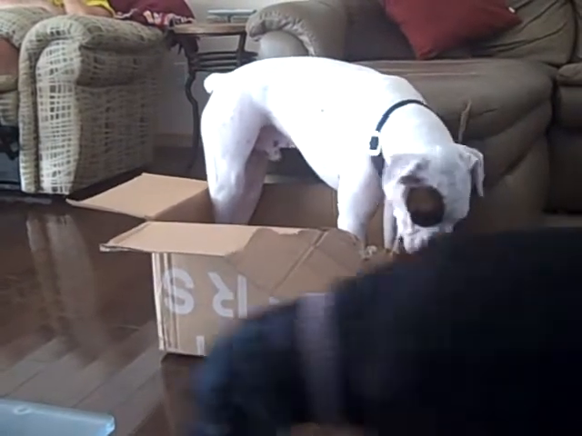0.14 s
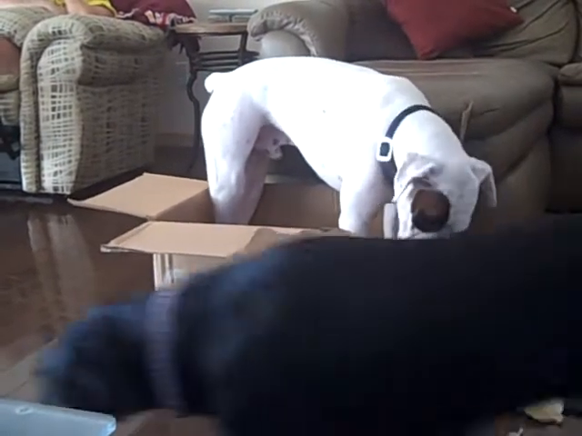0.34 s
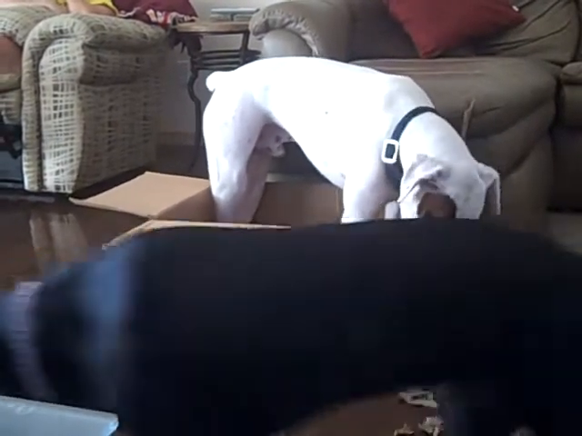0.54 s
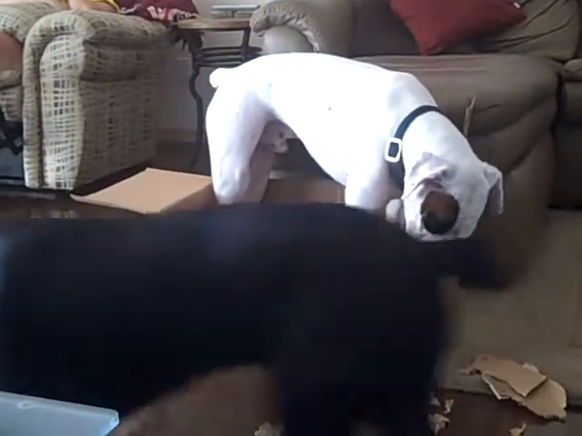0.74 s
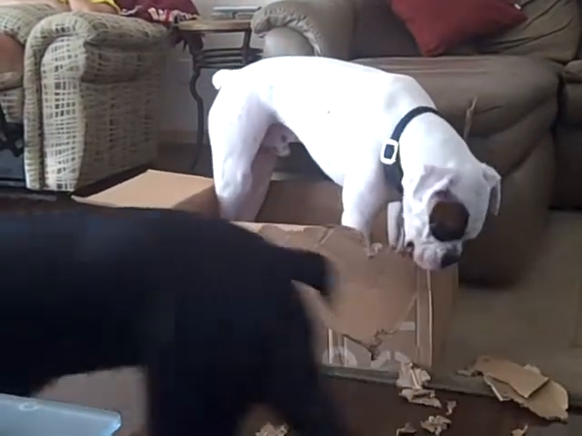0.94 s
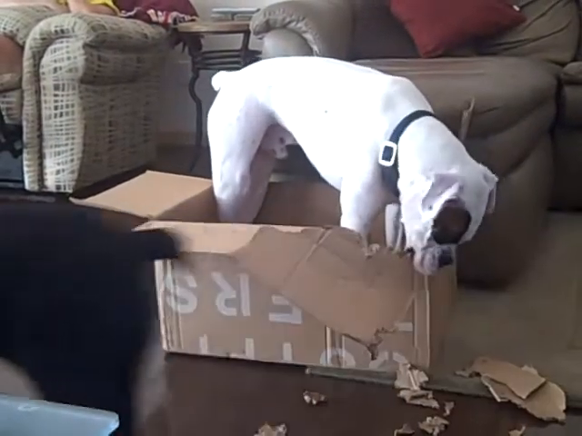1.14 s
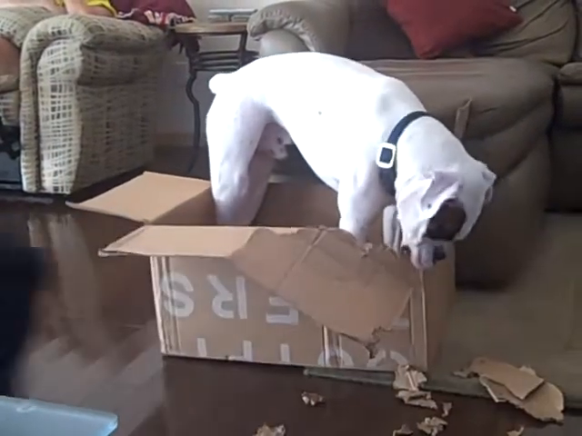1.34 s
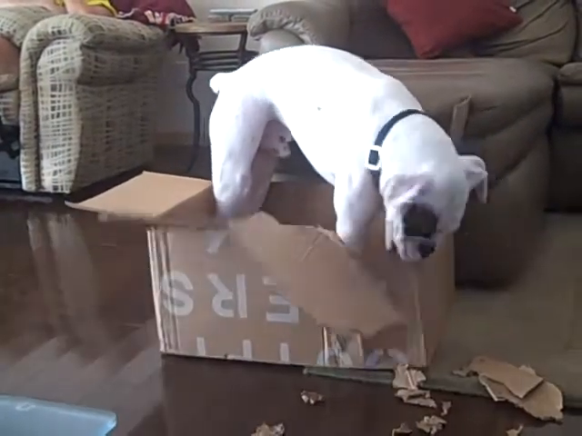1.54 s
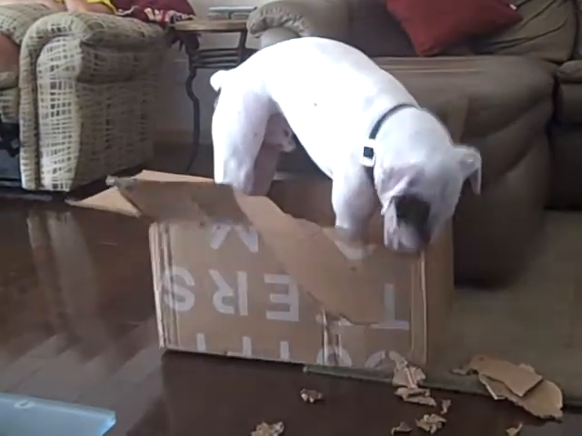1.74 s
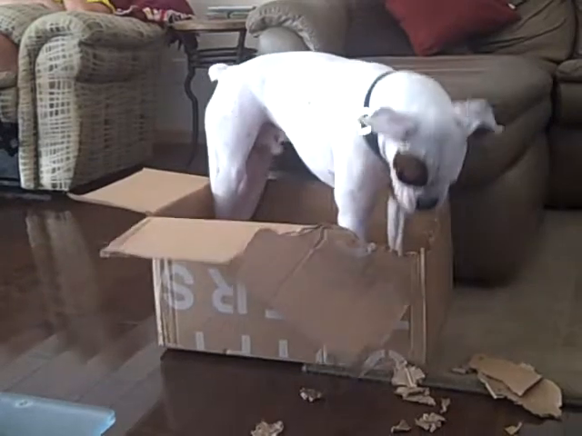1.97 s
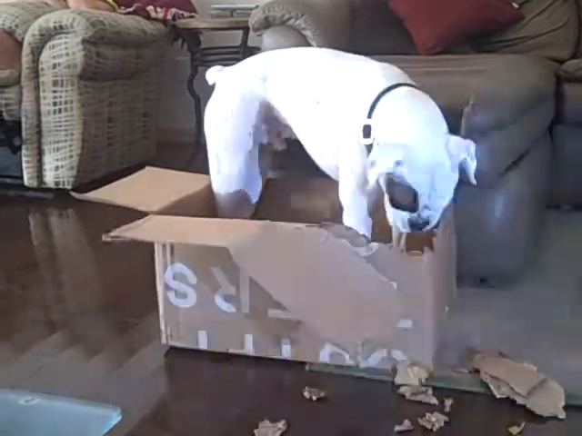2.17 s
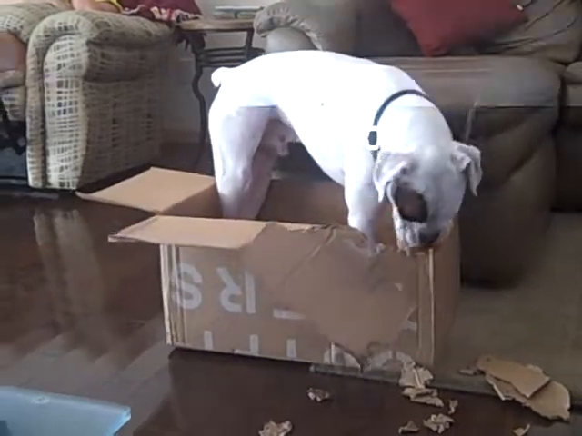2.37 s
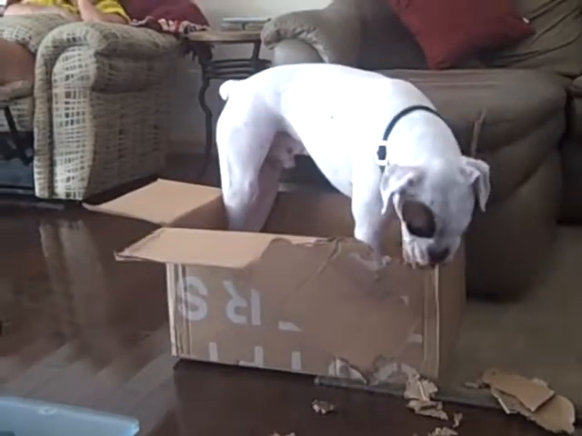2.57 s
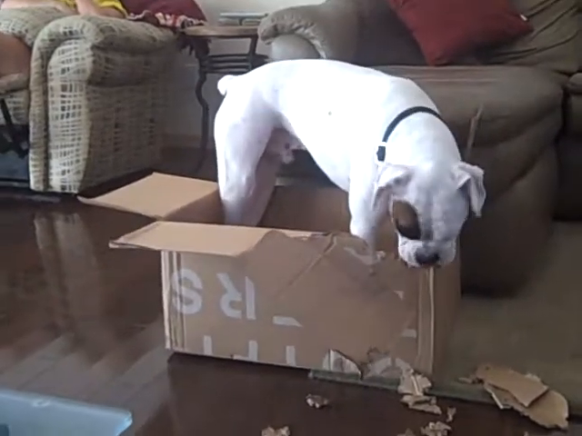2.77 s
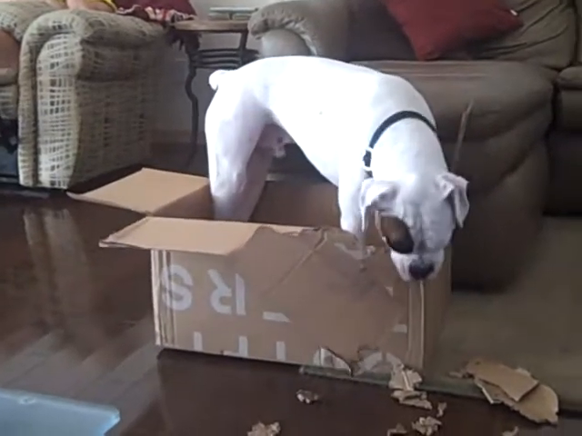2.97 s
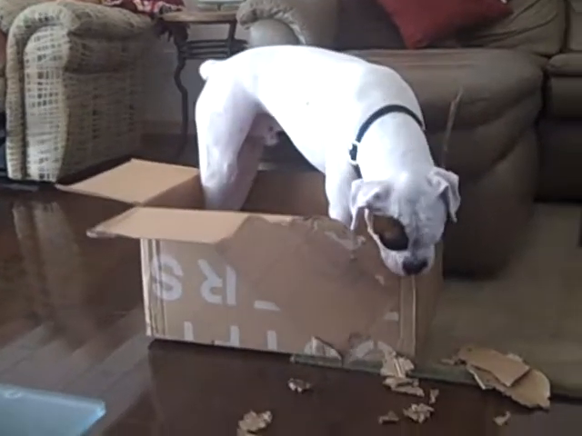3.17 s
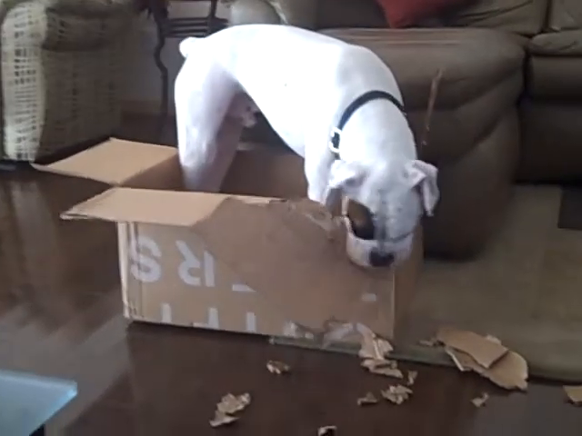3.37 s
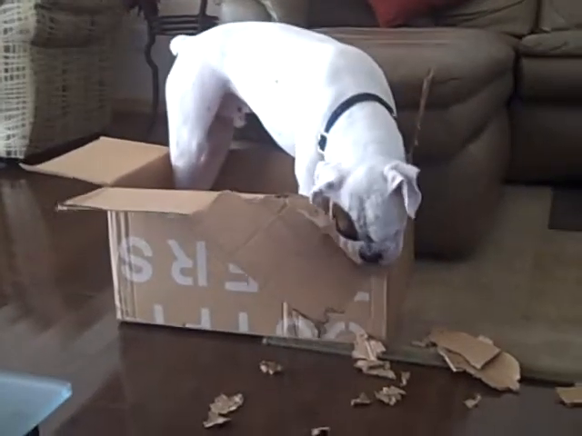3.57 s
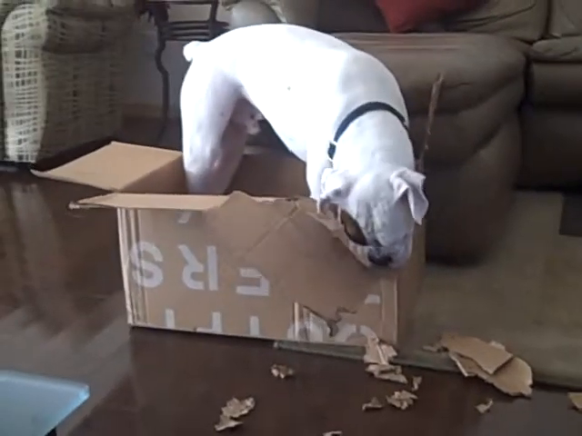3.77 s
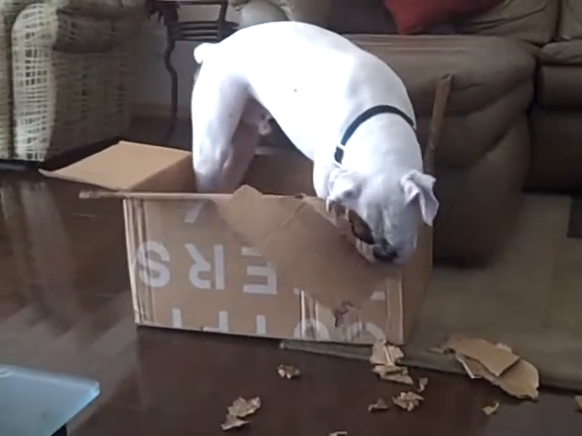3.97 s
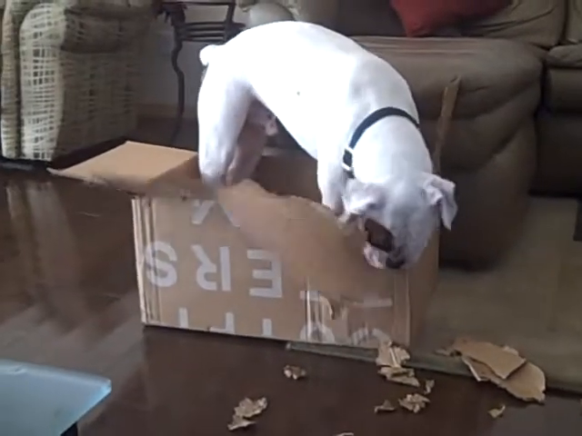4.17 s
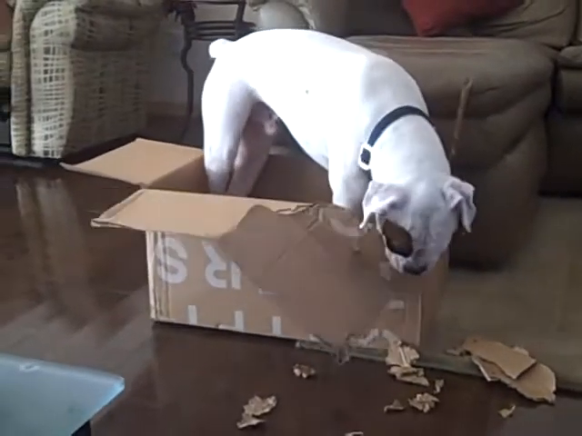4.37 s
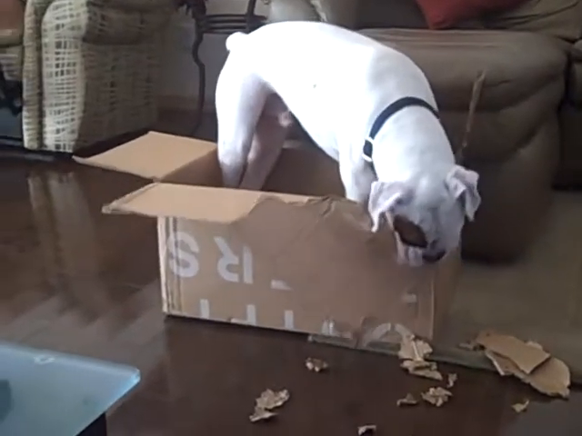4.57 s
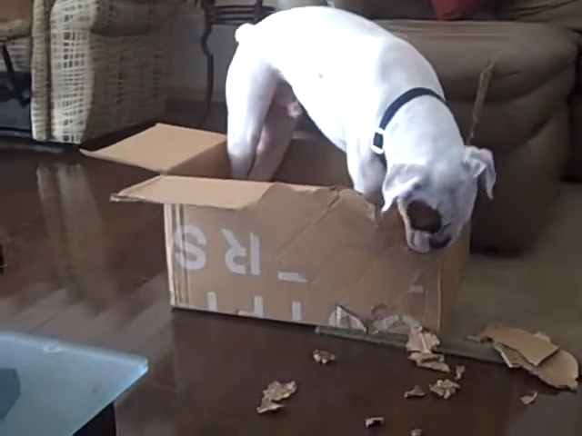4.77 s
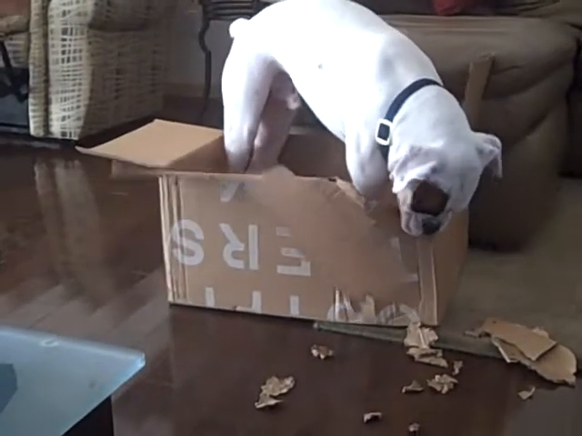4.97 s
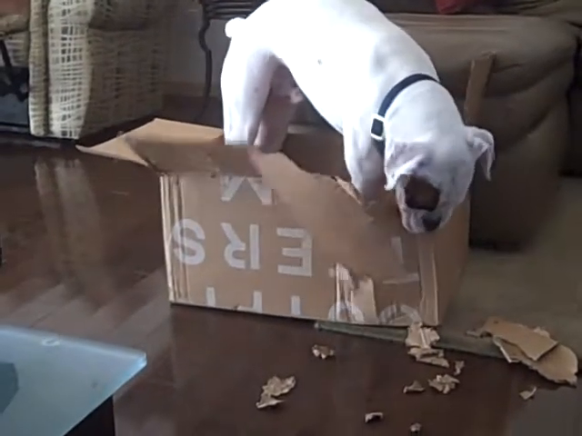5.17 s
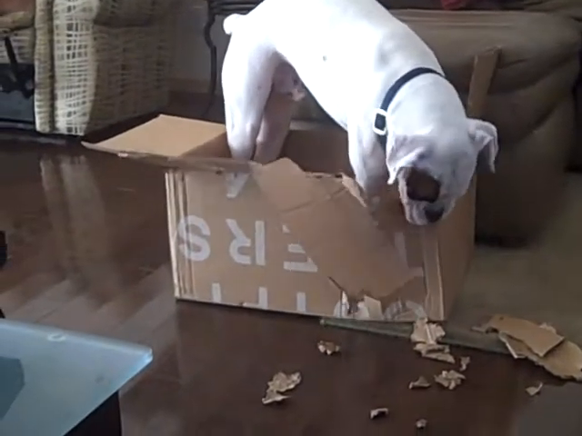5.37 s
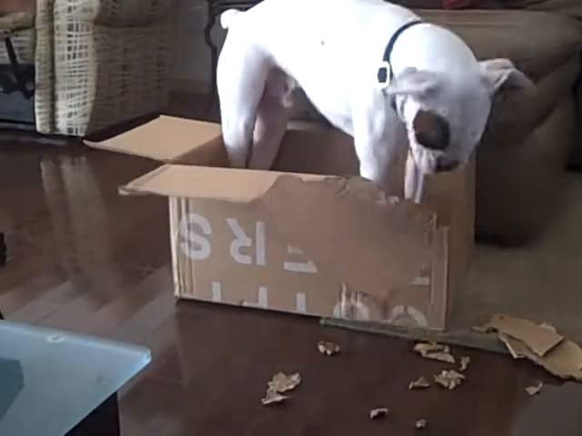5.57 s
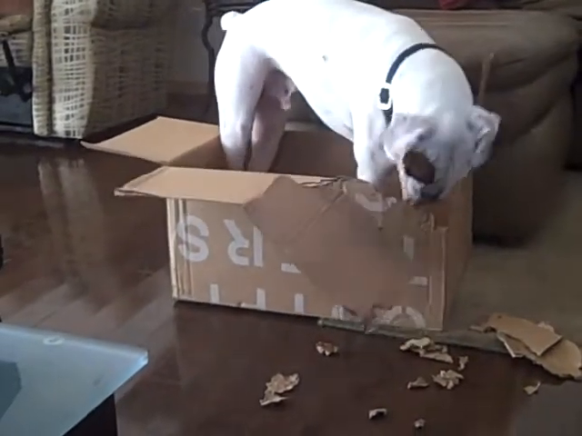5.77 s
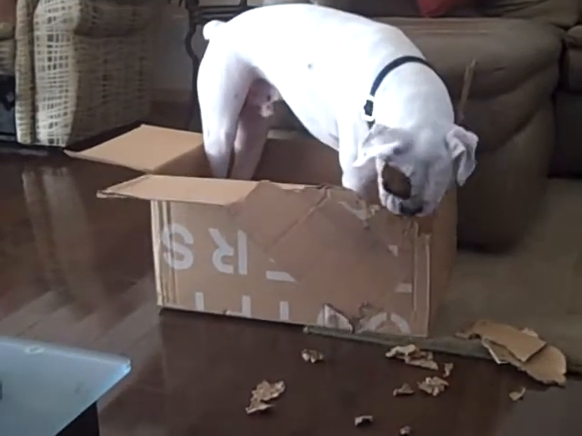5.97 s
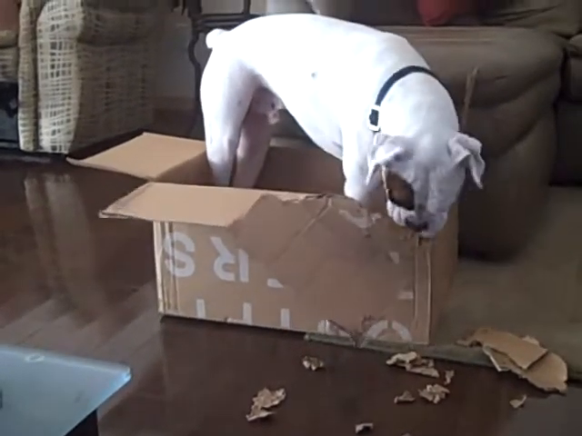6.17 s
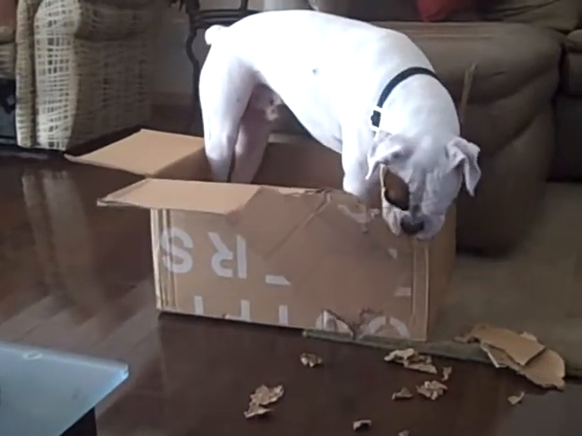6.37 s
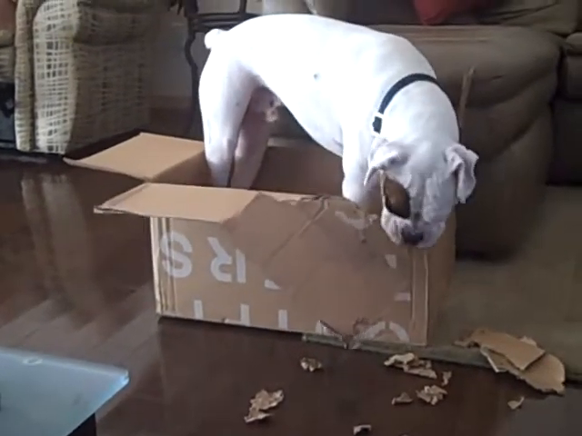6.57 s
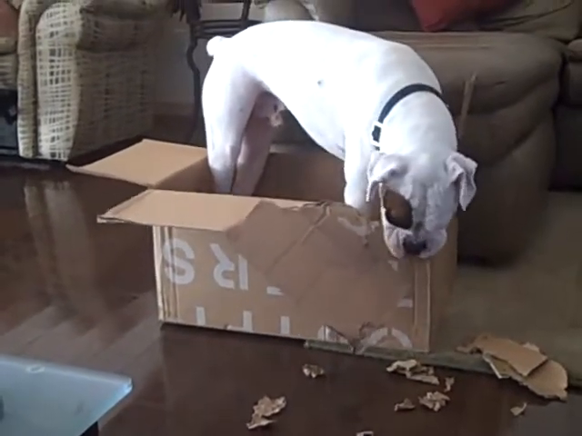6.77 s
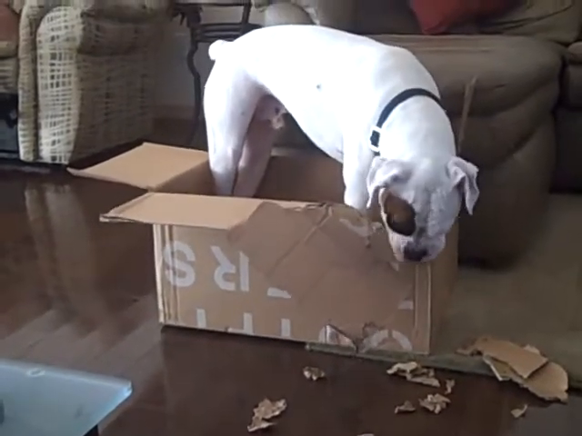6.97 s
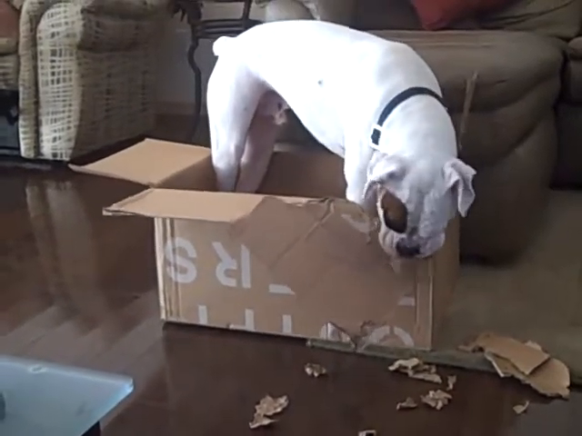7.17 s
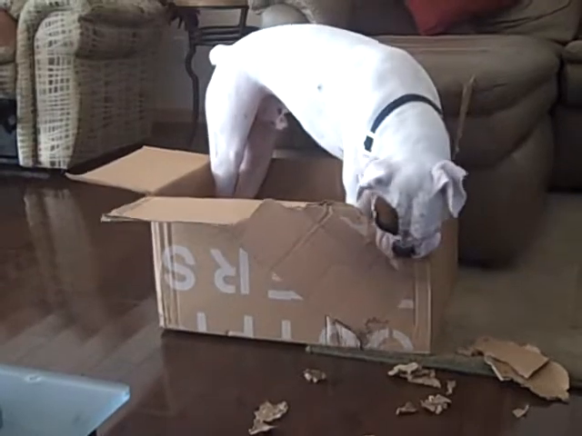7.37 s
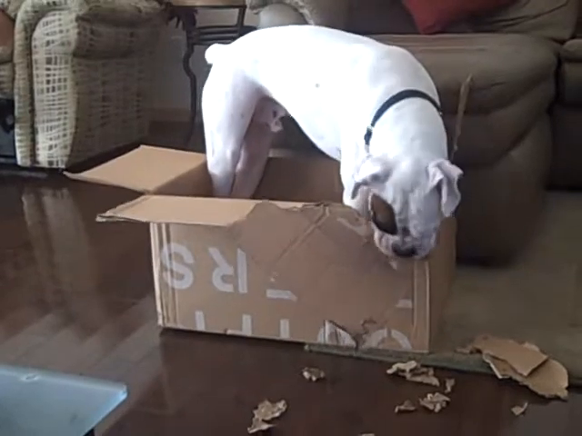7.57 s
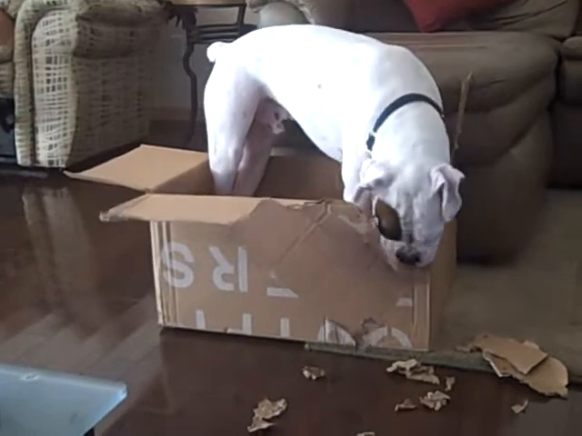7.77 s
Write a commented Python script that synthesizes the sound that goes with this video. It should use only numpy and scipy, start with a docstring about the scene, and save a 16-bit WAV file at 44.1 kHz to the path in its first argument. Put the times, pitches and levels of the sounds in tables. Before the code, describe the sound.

A dog gnaws at a cardboard box in a living room. Fine ripping crackles and dry rubbing come in uneven bursts, broken by sharp snaps and hollow knocks. Two harder tugs each bring a cluster of cracks and a deep thump, followed by soft sniffs and huffs. Near the end the dog whines very faintly as the chewing goes on. One small microphone picks it up from a few metres away.

```python
"""A living room: a dog stands in a cardboard box, chewing and tearing at its rim. Flutes snap and knock the
hollow panels, the paper liner rips in a fine crackle, card rubs on card. The dog snuffles through nose and
muzzle between tugs and whines faintly near the end. A few dry pops sound; after the two hardest tugs the
baseline jumps, then steps back. One small microphone, a few metres off."""
import sys
import numpy as np
from scipy import signal
from scipy.fft import rfft, irfft, next_fast_len
from scipy.io import wavfile

SR = 44100
rng = np.random.default_rng(int(sys.argv[2]) if len(sys.argv) > 2 else 0)


def dump_mix(stems):
    """Bounce the given channels to the path in sys.argv[1] as a 16-bit WAV at rate SR."""
    frames = np.atleast_2d(stems).T  # one column per channel
    limited = np.clip(frames, -1, 1)  # hard clip at full scale
    pcm = np.round(limited * 32767).astype(np.int16)
    wavfile.write(sys.argv[1], SR, pcm)


N = 344641
TIME_S = np.arange(N) / SR

# Spectral shapes. Each row: frequency in Hz, relative density in dB.
AIR_SPECTRUM = [(15, -24), (25, -7), (70, -18.5), (309, -17.5), (516, -16.5), (714, -12.5), (1070, -17.5),
                (2550, -18.5), (4610, -23), (12900, -35), (16000, -48)]
NOSTRIL_SPECTRUM = [(3500, -14), (4800, -1), (5300, 2.5), (5900, 2.5), (6600, 2), (7300, -11), (9000, -2),
                    (12000, -20), (16000, -10)]
HUFF_SPECTRUM = [(300, -9), (550, -8), (760, 5.5), (1050, -6), (1450, 0), (1850, -9.5), (2200, -7),
                 (2800, -5.5), (4000, -8.5), (5400, -10), (6300, -13), (7500, -13), (16000, -27)]
RIP_SPECTRUM = [(500, -6.5), (1500, 0.5), (3000, 0.5), (4500, 1), (7000, 0.5), (10000, 2), (13000, 2.5),
                (16000, -5.5)]
RUB_SPECTRUM = [(300, -7), (520, -4), (720, -3.5), (1000, 2), (1500, -1), (2200, -2.5), (3200, -7),
                (5000, -22), (9000, -43)]
FLEX_SPECTRUM = [(70, -14), (130, -11), (200, -1.5), (280, -3), (420, 2), (600, -10), (1200, -12.5)]
# Room decay. Each row: frequency in Hz, T60 in seconds.
REVERB_T60_S = [(120, .42), (300, .48), (800, .53), (2000, .55), (5000, .53), (10000, .44), (16000, .35)]
# Reverberation. Each row: frequency in Hz, level against the direct sound in dB.
REVERB_DB = [(120, -5), (300, -3.5), (800, -1.5), (2000, -3), (5000, -1.5), (10000, -7.5), (16000, -6.5)]
# Baseline jumps. Each row: start in seconds, step height as a fraction of full scale.
THUMPS = [(1.768, 0.018), (5.43, 0.018)]
# Dry pops. Each row: start in seconds, frequency in Hz, peak in dB, T60 in seconds.
DRY_POPS = [(3.231, 1860, -34, .011), (3.2322, 263, -46, .051), (5.712, 1240, -31, .014)]
# Whine. Each row: start in seconds, length in seconds, first and last pitch in Hz, relative level in dB.
WHINE_NOTES = [(6.959, 0.084, 440, 408, -56.5), (7.152, 0.16, 428, 405.6, -57), (7.41, .04, 427, 414, -62)]
# Sniffs. Each row: start in seconds, length in seconds, relative level in dB, nostril whistle in Hz.
NOSE_SNIFFS = [(2.17, 0.13, -67.5, 5860), (2.365, 0.073, -60, 5450), (2.548, 0.1, -63.5, 6460),
               (2.692, 0.068, -65, 6140), (3.062, 0.042, -70, 6000), (5.83, 0.047, -61, 5300),
               (6.037, 0.24, -67, 5800)]
# Wheezes. Each row: start in seconds, length in seconds, relative level in dB.
NOSE_WHEEZES = [(2.95, 0.15, -67), (6.6, 0.46, -76)]
# Huffs. Each row: start in seconds, length in seconds, relative level in dB, throat resonance in Hz.
MUZZLE_HUFFS = [(2.17, .1, -67, 1380), (2.38, 0.103, -64.5, 1400), (2.5, 0.053, -58, 1650),
                (2.55, 0.063, -55.5, 2200), (2.64, .11, -62, 1400), (5.85, 0.068, -58, 1480),
                (6.19, 0.053, -55.5, 2600), (6.255, 0.036, -51, 3270), (6.3, 0.024, -52.5, 2150)]
# Box resonances. Each row: frequency in Hz, width in Hz, relative gain in dB.
BOX_MODES = [(162.3, 7.1, -4), (209, 24, 3), (253.7, 23.7, 6.5), (308, 8.6, 3.5), (413, 11, 2),
             (636, 111, 4), (740, 41, 2.5), (1180, 52, -1), (1420, 165, -10.5), (1800, 400, -5.5)]
# Jaw tugs. Each row: start in seconds, length in seconds, relative rip and rub levels in dB.
JAW_TUGS = [(0.014, 0.16, -62, -53.5), (0.414, 0.093, -90, -54.5), (0.635, 0.12, -81, -54.5),
            (0.727, .08, -66, -50), (1.092, .14, -57, -49.5), (1.33, 0.17, -56.5, -69),
            (1.474, 0.041, -50.5, -44.5), (1.57, 0.22, -62.5, -56), (1.94, 0.14, -61, -56.5),
            (2.273, 0.45, -63, -60.5), (2.914, 0.35, -68, -57.5), (3.35, 0.27, -62.5, -55),
            (3.694, 0.043, -56, -52.5), (3.782, 0.15, -58.5, -58), (3.954, 0.027, -52.5, -55),
            (4.026, 0.061, -56, -68), (4.17, 0.16, -62.5, -58.5), (4.702, 0.023, -52.5, -49),
            (4.764, 0.076, -55.5, -45), (4.843, 0.092, -54.5, -52), (4.982, 0.036, -51.5, -45),
            (5.054, 0.18, -54, -50.5), (5.164, 0.057, -58, -47.5), (5.274, 0.28, -58, -53),
            (5.56, 0.19, -58, -57.5), (5.84, 0.47, -64, -66), (6.622, 0.11, -62.5, -54.5),
            (6.843, 0.18, -68.5, -55), (7.155, 0.18, -55.5, -46), (7.39, 0.31, -68.5, -54),
            (7.63, 0.2, -81, -49), (7.77, .05, -59, -41.5)]
# Snap bands: panel thud, knock, crack, crunch, fibre fizz. Each row: low and high edge in Hz.
SNAP_BANDS_HZ = [(155, 450), (450, 1200), (1200, 3500), (3500, 8000), (8000, 15900)]
# Snapping flutes. Each row: start in seconds, fracture decay in seconds, ring of the torn piece in Hz,
# relative level in dB, tilt in dB per octave, relative panel thud in dB.
FLUTE_SNAPS = [(0.0834, 0.0038, 4500, -62.5, 3, -81), (.338, 0.017, 720, -68.5, -7, -58),
               (0.4029, .002, 2430, -63, -1.5, -62), (.4672, 0.0039, 3680, -61, -0.5, -65),
               (0.627, 0.015, 593, -66.5, -6.5, -56), (.69, 0.025, 2060, -62.5, -1, -57),
               (.735, .0033, 3120, -49.5, 0, -60), (.7807, 0.0012, 2550, -56.5, 0.5, -75),
               (.856, 0.011, 805, -54.5, -3.5, -53), (.895, .006, 715, -61, -1.5, -72),
               (1.0249, 0.0086, 900, -56.5, -5, -52.5), (1.085, .0045, 1730, -45, 1, -49),
               (1.2172, 0.0034, 3250, -62, 4, -69), (1.236, .0017, 4540, -64, 2.5, -71),
               (1.471, 0.0086, 5480, -60.5, 1.5, -54), (1.74, 0.006, 1840, -47, 2, -41.5),
               (1.753, 0.012, 1900, -50, 2.5, -45), (1.7673, 0.0025, 1050, -36.5, 1, -40),
               (1.7689, 0.0019, 1690, -41, 2.5, -43), (1.7778, 0.0052, 647, -40, -4.5, -31),
               (1.8007, 0.0029, 460, -43, -5, -46), (1.854, .0026, 1020, -56, 3.5, -66),
               (3.0313, 0.0048, 630, -59, -4.5, -51), (3.048, .004, 640, -70, -1, -56),
               (3.342, 0.0022, 630, -63, -5, -56), (3.4414, .0021, 1810, -60, -5, -67),
               (3.4767, 0.0025, 1470, -37, -3.5, -44), (3.5057, 0.004, 1910, -60, 5.5, -51),
               (3.6558, .0027, 1670, -67, 4, -74), (3.699, .0045, 2900, -58.5, -1, -65),
               (3.7861, .0029, 3520, -65, 0, -73), (4.0294, 0.0037, 1440, -68, 4, -76),
               (4.19, 0.0014, 1480, -49.5, -1, -55.5), (4.378, 0.021, 1240, -56.5, -4.5, -52),
               (4.399, 0.012, 1430, -52.5, -3, -72), (4.5359, 0.0025, 1450, -50.5, -5.5, -50),
               (4.592, 0.0026, 1710, -36.5, -2, -48), (4.615, 0.00038, 1670, -42, -3, -51),
               (4.7814, 0.0033, 2000, -47, -1, -52.5), (4.803, .002, 3200, -55, -1, -64),
               (4.985, 0.0053, 1410, -60.5, 0.5, -56.5), (5.0828, 0.0019, 2080, -73, 6.5, -53),
               (5.1728, 0.016, 5730, -48, 0, -49), (5.4276, 0.0017, 1470, -36, 1, -37),
               (5.4336, 0.0036, 674, -37.5, -1.5, -36.5), (5.455, 0.0093, 1190, -44.5, -7.5, -42),
               (5.508, 0.0056, 1240, -52.5, -7, -43), (5.8376, 0.00079, 5120, -65.5, 2.5, -77),
               (6.467, 0.00083, 2490, -67.5, -3, -78), (6.535, 0.0041, 647, -62.5, -0.5, -57),
               (6.566, 0.0023, 700, -68.5, -6.5, -57.5), (6.584, 0.0017, 2520, -60.5, -2.5, -57),
               (6.713, .002, 3480, -64, -2, -60), (6.8029, 0.0034, 3300, -49, -0.5, -47),
               (7.0789, 0.0015, 890, -52.5, -5, -50.5), (7.1601, 0.00082, 3930, -58, -0.5, -68),
               (7.1974, 0.0011, 740, -42.5, -1.5, -39.5), (7.5571, 0.0013, 675, -37, -3, -41.5),
               (7.578, 0.00086, 980, -48, -5, -55), (7.7622, 0.0014, 805, -53, -4, -47.5),
               (7.796, 0.003, 4100, -45, -0.5, -55)]


def from_db(db):
    """Decibels to gain."""
    return 10 ** (np.asarray(db) / 20)


def unit_rms(x):
    """Scale to rms 1."""
    return x / np.sqrt(np.mean(x ** 2) + 1e-20)


def at_hz(table, hz):
    """Read a table on a log-frequency axis."""
    knots_hz, values = np.transpose(table)
    return np.interp(np.log(np.maximum(hz, 1)), np.log(knots_hz), values)


def bandpass(x, low_hz, high_hz, order=2):
    """Causal Butterworth band-pass."""
    sos = signal.butter(order, [low_hz, high_hz], "band", fs=SR, output="sos")
    return signal.sosfilt(sos, x + 1e-18)


def resonance(x, hz, width_hz):
    """Two-pole resonance, unity peak gain."""
    r = np.exp(-np.pi * width_hz / SR)
    feedback = [1, -2 * r * np.cos(2 * np.pi * hz / SR), r * r]
    return signal.lfilter(np.array([1, 0, -1]) * (1 - r * r) / 2, feedback, x + 1e-18)


def coloured(x, spectrum):
    """Give a steady texture a spectrum; rms 1."""
    size = next_fast_len(N)
    gain = from_db(at_hz(spectrum, np.arange(size // 2 + 1) * SR / size))
    return unit_rms(irfft(rfft(x, size) * gain, size)[:N])


def drift(knots_per_s):
    """Random wander, standard deviation 1."""
    knots = rng.standard_normal(N // 10)
    return np.interp(TIME_S * knots_per_s, np.arange(len(knots)), knots) * np.sqrt(3 / 2)


def swells(rows, attack_s, release_s):
    """Trapezoid gains summed in power. Each row: start in seconds, length in seconds, level in dB."""
    gain = np.zeros(N)
    for start_s, length_s, db in rows:
        end_s = start_s + max(length_s, attack_s)
        corners_s = [start_s - attack_s / 2, start_s + attack_s / 2, end_s, end_s + release_s]
        gain = np.hypot(gain, from_db(db) * np.interp(TIME_S, corners_s, [0, 1, 1, 0]))
    return gain


def still_air(level_db=-64):
    """Steady, faint room noise."""
    return from_db(level_db) * coloured(rng.standard_normal(N), AIR_SPECTRUM)


def room(x, first_s=0.004, build_s=0.008, ceiling_s=0.044, echo_db=1.5):
    """Diffuse reverberation builds, swells with the ceiling echo and dies band by band."""
    t = TIME_S[:SR * 3 // 4]
    white, tail = rng.standard_normal((2, len(t))), np.zeros(len(t))
    onset = 1 - np.exp(-np.maximum(t - first_s, 0) / build_s)
    onset *= from_db(echo_db * np.exp(-((t - ceiling_s) / 0.01) ** 2))
    edges_hz = np.geomspace(90, 17000, 14)
    for k, (low_hz, high_hz) in enumerate(zip(edges_hz, edges_hz[1:])):
        hz = np.sqrt(low_hz * high_hz)
        decay = from_db(-60 * t / at_hz(REVERB_T60_S, hz))
        part = bandpass(white[k % 2], low_hz, high_hz) * onset * decay
        part *= np.sqrt(2 * (high_hz - low_hz) / SR / np.sum(part ** 2))   # unity gain in the band
        tail += part * from_db(at_hz(REVERB_DB, hz))
    return x + signal.fftconvolve(x, tail)[:N]


def sub_thumps(hold_s=0.359, step_s=0.034, settle_s=0.085, back_ratio=0.22):
    """A baseline jump, then four small steps the other way; each leaks back to rest."""
    steps = np.zeros(N)
    for start_s, height in THUMPS:
        steps[round(start_s * SR)] += height
        back_s = start_s + hold_s + step_s * np.arange(4)
        steps[np.round(back_s * SR).astype(int)] -= back_ratio * height
    return signal.lfilter([1], [1, -np.exp(-1 / (settle_s * SR))], steps)


def pops():
    """Each pop is one fast-decaying sine."""
    t, out = TIME_S[:SR // 10], np.zeros(N)
    for start_s, hz, peak_db, t60_s in DRY_POPS:
        at = round(start_s * SR)
        out[at:at + len(t)] += from_db(peak_db - 60 * t / t60_s) * np.sin(2 * np.pi * hz * t)
    return out


def whine(waver_ratio=0.0072, fade_s=0.044, trim_db=-1):
    """The dog's thin, nearly pure notes, each sagging in pitch."""
    out = np.zeros(N)
    waver = 1 + waver_ratio * drift(40)
    for start_s, length_s, first_hz, last_hz, db in WHINE_NOTES:
        pitch_hz = np.interp(TIME_S, [start_s, start_s + length_s], [first_hz, last_hz]) * waver
        tone = np.sqrt(2) * np.sin(2 * np.pi * np.cumsum(pitch_hz) / SR)
        out += tone * swells([(start_s, length_s, db + trim_db)], fade_s, fade_s)
    return out


def snuffle(attack_s=0.011, release_s=0.013, flutter_db=3):
    """Air hisses, whistles and wheezes in narrow nostrils, huffs through throat and flapping muzzle."""
    def breaths(rows, spectrum, hiss_db, peak_db, width_hz):
        hiss, out = coloured(rng.standard_normal(N), spectrum), np.zeros(N)
        for start_s, length_s, db, hz in rows:
            peak = unit_rms(resonance(hiss, hz, width_hz))
            gain = swells([(start_s, length_s, db)], attack_s, release_s)
            out += gain * (from_db(hiss_db) * hiss + from_db(peak_db) * peak)
        return out

    sniffs = breaths(NOSE_SNIFFS, NOSTRIL_SPECTRUM, hiss_db=0, peak_db=-4, width_hz=550)
    huffs = breaths(MUZZLE_HUFFS, HUFF_SPECTRUM, hiss_db=-1.5, peak_db=-4, width_hz=600)
    wheezes = unit_rms(resonance(rng.standard_normal(N), hz=3340, width_hz=350))
    wheezes *= swells(NOSE_WHEEZES, attack_s, release_s)
    return (sniffs + wheezes + huffs) * from_db(flutter_db * drift(70))


def box(x, trim_db=-2):
    """The hollow box adds its resonances to whatever shakes it."""
    ringing = sum(from_db(db) * resonance(x, hz, width_hz) for hz, width_hz, db in BOX_MODES)
    return from_db(trim_db) * (x + ringing)


def fibre_breaks(per_s, spread_db, clump_db):
    """Fibres break at random: impulses, mostly small, the strong ones in clumps."""
    sizes = from_db(spread_db * np.minimum(rng.exponential(1, N), 4) + clump_db * drift(70))
    return sizes * rng.choice([-1, 1], N) * (rng.random(N) < per_s / SR)


def chewing(attack_s=0.011, release_s=0.055, idle_rip_db=-69.5, idle_rub_db=-65.5):
    """Each tug rips the liner, rubs card on card and flexes the panels; lone fibres tick."""
    tugs = np.array(JAW_TUGS)
    # The idle floor is the gnawing between tugs.
    rip_gain = np.hypot(swells(tugs[:, [0, 1, 2]], attack_s, release_s), from_db(idle_rip_db))
    rub_gain = np.hypot(swells(tugs[:, [0, 1, 3]], attack_s, release_s), from_db(idle_rub_db))
    flex_gain = 0.77 * rip_gain + 0.15 * rub_gain   # shares of the pull that bend the panels
    rip = from_db(1) * coloured(fibre_breaks(per_s=7000, spread_db=3.5, clump_db=3), RIP_SPECTRUM)
    rub = from_db(-7.5) * coloured(fibre_breaks(per_s=2000, spread_db=3, clump_db=3.5), RUB_SPECTRUM)
    flex = from_db(-11) * coloured(fibre_breaks(per_s=600, spread_db=1.5, clump_db=4.5), FLEX_SPECTRUM)
    lone_fibres = fibre_breaks(per_s=30, spread_db=3.5, clump_db=1)
    ticks = from_db(-77) * unit_rms(bandpass(lone_fibres, 900, 4400))
    return rip_gain * rip + rub_gain * rub + flex_gain * flex + ticks


def snap_shape_db(ring_hz, tilt_db_per_octave, pivot_hz=1900, hump_db=4):
    """Band gains above the thud: a tilt, plus a hump where the torn piece radiates most."""
    centres_hz = np.sqrt(np.prod(SNAP_BANDS_HZ[1:], axis=1))
    tilt_db = tilt_db_per_octave * np.log2(centres_hz / pivot_hz)
    lift_db = hump_db * np.exp(-np.log2(centres_hz / ring_hz) ** 2)
    return tilt_db + lift_db + [-2.56, 3.33, 2.3, 1.6]   # knock, crack, crunch, fizz


def snaps(grit_db=3.5, bounce_s=0.0035, bounce_db=-5.5, ring_db=9, ring_q=3.4):
    """A flute fails in a burst of tiny cracks that rings the torn piece; the box wall reflects it."""
    t, out = TIME_S[:SR // 12], np.zeros(N + SR)
    for start_s, fracture_s, ring_hz, snap_db, tilt_db_per_octave, thud_db in FLUTE_SNAPS:
        at = round(start_s * SR)
        cracks = rng.choice([-1, 1], len(t)) * from_db(grit_db * rng.standard_normal(len(t)))
        levels_db = [thud_db, *(snap_db + snap_shape_db(ring_hz, tilt_db_per_octave))]
        for (low_hz, high_hz), db in zip(SNAP_BANDS_HZ, levels_db):
            decay_s = max(fracture_s, 0.0005) + 1 / np.sqrt(low_hz * high_hz)   # low bands last longest
            bounce = from_db(bounce_db) * (t > bounce_s) * np.exp(-np.abs(t - bounce_s) / decay_s)
            burst = cracks * (np.exp(-t / decay_s) + bounce)
            ring = from_db(ring_db) * resonance(burst, ring_hz, ring_hz / ring_q)
            snap = bandpass(burst + ring, low_hz, high_hz, order=3)
            snap *= np.sqrt(0.01 * SR / np.sum(snap ** 2))   # energy of 10 ms at rms 1
            out[at:at + len(t)] += from_db(db) * snap
    return out[:N]


def scene():
    """Box and dog in the room, over still air; mono."""
    air = still_air()
    cardboard = box(snaps() + chewing())
    reverberant = room(cardboard + snuffle() + whine())
    return (air + sub_thumps() + pops() + reverberant)[None]


def record(dry, cutoff_hz=16100):
    """Steep elliptic low-pass."""
    return signal.sosfilt(signal.ellip(10, 0.2, 70, cutoff_hz, fs=SR, output="sos"), dry)


dry = scene()
out = record(dry)
dump_mix(out)
```